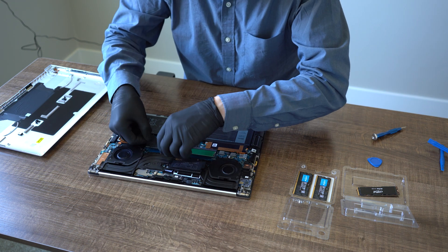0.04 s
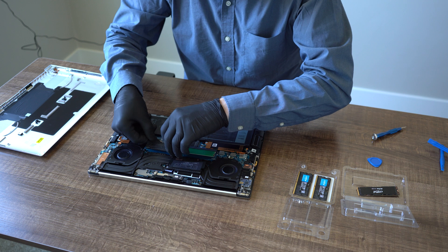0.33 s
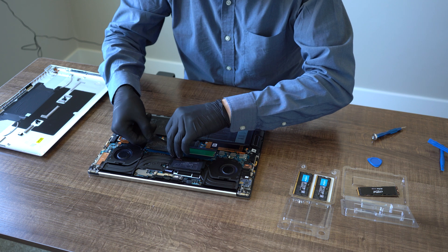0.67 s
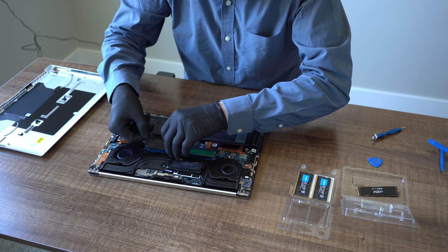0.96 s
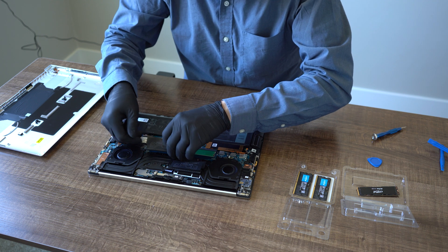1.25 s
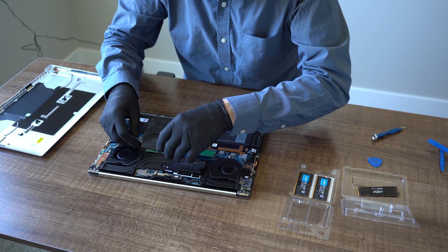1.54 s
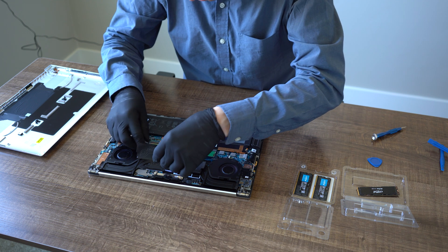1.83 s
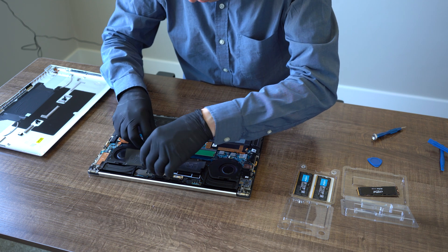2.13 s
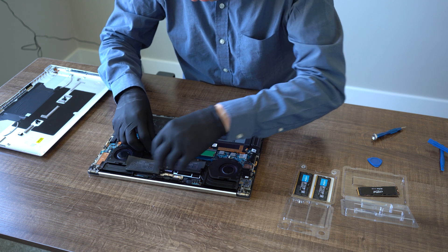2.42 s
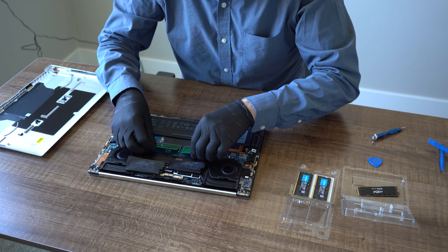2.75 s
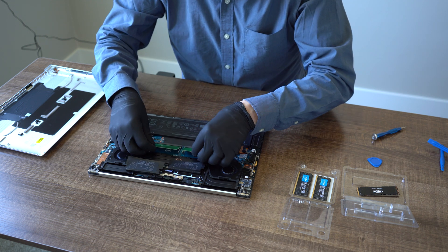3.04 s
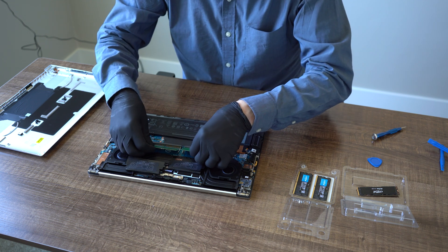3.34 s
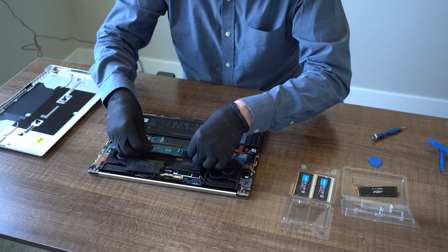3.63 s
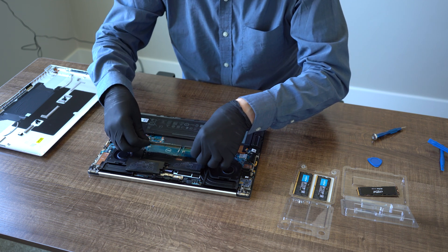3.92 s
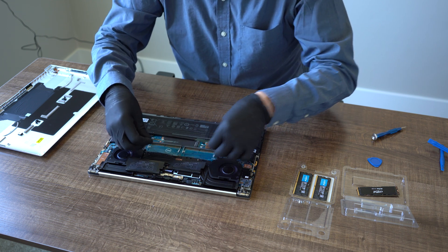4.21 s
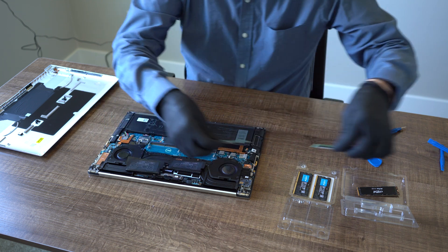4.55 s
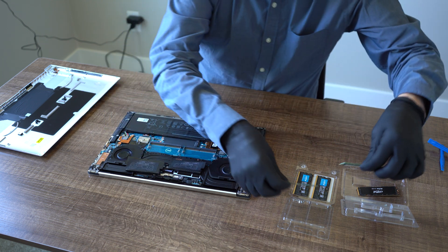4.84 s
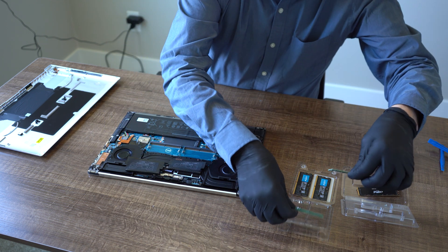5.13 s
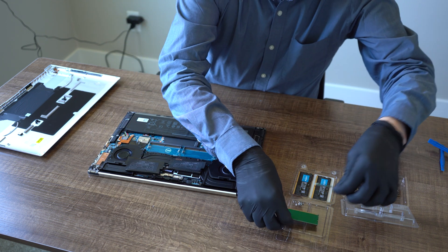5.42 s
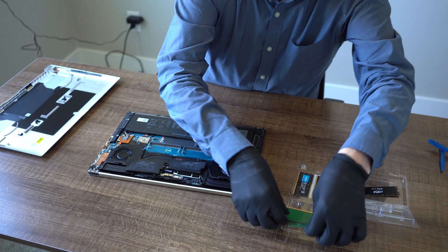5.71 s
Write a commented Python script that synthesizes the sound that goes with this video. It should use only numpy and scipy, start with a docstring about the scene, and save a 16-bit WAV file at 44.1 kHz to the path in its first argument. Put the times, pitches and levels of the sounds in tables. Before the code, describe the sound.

In a small, echoing room with faint hiss and hum, a laptop's memory modules are unlatched straight in front of the microphone. Light metal ticks and dull finger knocks on the circuit board surround several sharp snaps, one loud pair ringing with a steel twang. Gloves rustle quietly throughout. After a short lull, cloth swishes and the modules click and scrape into a thin plastic tray a little to the right.

```python
"""In a small, echoing room with a low hum, gloved hands rustle and tick at the clips of an open laptop.
From about 0.9 s the latches of two memory modules snap: the board rings, the case thumps on the wooden
table, and at 1.6 s a steel spring twangs. Fingers knock on the board as the modules pop up and come out.
Near 4.5 s a sleeve swishes as the arms swing over; then the modules tap and skid in a thin plastic tray."""
import sys
import numpy as np
from scipy import signal
from scipy.fft import rfft, irfft, next_fast_len
from scipy.io import wavfile
from scipy.ndimage import uniform_filter1d

SR = 44100
rng = np.random.default_rng(int(sys.argv[2]) if len(sys.argv) > 2 else 0)


def dump(signal):
    """Clip the signal to [-1, 1] and save it as 16-bit WAV at the path in sys.argv[1]."""
    limited = np.clip(np.atleast_2d(signal).T, -1, 1)
    pcm = np.round(limited * 32767).astype(np.int16)
    wavfile.write(sys.argv[1], SR, pcm)


N = 263277
SIZE = 32768   # samples in one short sound
TIME = np.arange(N) / SR   # seconds since the scene began
AGE = np.arange(SIZE) / SR   # seconds since a short sound began
FREQ = np.maximum(np.fft.rfftfreq(SIZE, 1 / SR), 1)   # its frequencies in Hz
PIVOT_HZ = 2120   # where bass and treble meet


def from_db(db):
    """Turn decibels into a factor to multiply by."""
    return 10 ** (np.asarray(db) / 20)


def rms_one(x):
    """Scale a signal to an average power of 1."""
    return x / np.sqrt(np.mean(x ** 2) + 1e-20)


def at_hz(points, hz):
    """Read between the rows of a (pitch_hz, value) table, with octaves evenly spaced."""
    pitches, values = np.transpose(points)
    return np.interp(np.log(np.maximum(hz, 1)), np.log(pitches), values)


def level_curve(rows):
    """Volume over time from (time_s, level_db) rows."""
    return from_db(np.interp(TIME, *np.transpose(rows)))


def bell(f, hz, width):
    """A resonance: a peak of height 1 around one pitch."""
    return 1 / (1 + (2 * (f - hz) / width) ** 2)


def add(out, start_s, sound):
    """Mix a short sound in, fading out its very end."""
    i = int(np.clip(round(start_s * SR), 0, N - 1))
    fade = np.minimum(1, np.linspace(10, 0, SIZE)) ** 2
    out[:, i:i + SIZE] += (sound * fade)[:, :N - i]


def diffuse(size):
    """Spectrum of white noise from all around: left and right match in the bass but not in the treble."""
    # how alike the two microphones hear it: pitch_hz, likeness (0 to 1)
    likeness = [(60, 1), (130, 0.98), (260, 0.86), (520, 0.57), (1000, 0.35), (2000, 0.03), (4000, 0),
                (9000, 0.05)]
    alike = np.clip(at_hz(likeness, np.fft.rfftfreq(size, 1 / SR)), 0, 1)
    mid, side = rfft(rng.standard_normal((2, size)))
    return (np.sqrt(1 + alike) * mid + np.sqrt(1 - alike) * side * [[1], [-1]]) / np.sqrt(2)


def noise(gain_at):
    """Stereo noise of power 1; gain_at says how strong each frequency is."""
    size = 2 * next_fast_len(N // 2 + 1)
    spectrum = diffuse(size) * gain_at(np.fft.rfftfreq(size, 1 / SR))
    return rms_one(irfft(spectrum)[:, :N])


def room_decay(early_boost=3.9, early_s=0.029, gap_s=0.00087):
    """Split the room's echo into bands of pitch; each falls quickly at first, then slowly."""
    # time the room takes to fade by 60 dB: pitch_hz, fade_s
    fade_times = [(120, 0.69), (300, 0.83), (1000, 0.71), (2000, 0.77), (3900, 0.81), (7500, 0.6),
                  (14000, 0.39)]
    hz, fade_s = np.transpose(fade_times)
    bands = np.array([at_hz(list(zip(hz, one)), FREQ) for one in np.eye(len(hz))])
    slow = from_db(-60 * AGE / fade_s[:, None]) ** 2
    quick = early_boost * np.exp(-AGE / early_s)
    onset = 1 - np.exp(-(AGE / gap_s) ** 2)
    power = (slow + quick) * onset
    return bands, np.sqrt(power / power.sum(axis=1, keepdims=True))


def room(direct_db, decay, scatter_s=0.0012, scatter_hz=3600, small_hz=400, shade_hz=9500):
    """Spectrum of the room's answer to a click: direct sound, first echoes and a fading tail."""
    # first echoes from table and walls: delay_s, left_db, right_db
    echoes = [(.0042, -4, -23), (.0067, -3, -11), (0.0123, -15, -27), (0.0173, -11, -5.5)]
    white = diffuse(SIZE)
    tail = sum(irfft(white * band) * envelope for band, envelope in zip(*decay))
    paths = np.zeros((2, SIZE))
    paths[:, 0] = 1
    for delay, left_db, right_db in echoes:
        paths[:, int(delay * SR * rng.uniform(.95, 1.05))] += from_db([left_db, right_db])
    # the bass leaves as one pulse, the treble scatters off small parts for a millisecond
    scatter = rng.standard_normal(512) * np.exp(-AGE[:512] / scatter_s)
    scatter = rfft(scatter / np.linalg.norm(scatter), SIZE)
    z = 1j * FREQ / scatter_hz
    pulse = (1 + z * z * scatter) / (1 + np.sqrt(2) * z + z * z)
    pulse *= 1j * FREQ / (1j * FREQ + small_hz)   # small parts give off little bass
    pulse /= 1 + 1j * FREQ / shade_hz   # the hands block the highest treble
    return rfft(tail) + from_db(direct_db) * pulse * rfft(paths)


def push(tone, weight_db, hardness_db, low_hz=910, high_hz=7560):
    """Tone of a touch in dB: a heavier one has more bass, a harder one more treble."""
    tilt = [(low_hz, weight_db), (PIVOT_HZ, 0), (high_hz, hardness_db)]
    return at_hz(tone, FREQ) + at_hz(tilt, FREQ)


def struck(tone_db):
    """Turn a tone curve into the spectrum of a sound that starts at once, then rings (minimum phase)."""
    cepstrum = irfft(np.log(from_db(tone_db)))
    cepstrum[1:SIZE // 2] *= 2
    cepstrum[SIZE // 2 + 1:] = 0
    return np.exp(rfft(cepstrum))


def plate(tone_db, modes, spread_s):
    """A push makes a thin plate ring; as it bends, the treble travels ahead of the bass."""
    boost_db = sum(db * bell(FREQ, hz, width) for hz, width, db in modes)
    bass_lag = np.exp(-4j * np.pi * spread_s * np.sqrt(FREQ * PIVOT_HZ))
    return struck(tone_db + boost_db) * bass_lag


def background(air_db=-57.5):
    """The room's faint hiss and wavering low hum."""
    # tone of the hiss: pitch_hz, level_db
    air_tone = [(12, -48), (20, 9.5), (49, -9), (116, 0.5), (198, -5.5), (310, -8.5), (357, -7),
                (399, -11.5), (513, -6), (873, -14), (1090, -12.5), (1370, -15), (1810, -14.5),
                (14700, -27.5), (16000, -35)]
    # notes of the hum: pitch_hz, width_hz, level_db
    hum_notes = [(75.74, 2.4, 0.5), (63.7, 10, -2), (110, 4.7, -5)]
    # rise and fall of the hum: time_s, level_db
    hum_levels = [(0.0, -66), (0.25, -56), (1.48, -63.5), (1.66, -59.5), (2.33, -70), (3.92, -53.5),
                  (4.26, -57), (4.59, -54.5), (5.97, -58)]
    air = noise(lambda f: from_db(at_hz(air_tone, f)))
    hum = noise(lambda f: sum(from_db(db) * bell(f, hz, width) for hz, width, db in hum_notes))
    return from_db(air_db) * air + level_curve(hum_levels) * hum


def gloves_and_sleeves(swing_s=4.534, hold_s=0.35, swing_db=-49.5, grain_db=-1.8):
    """Cloth slides in many tiny slips: quietly as the fingers work, in one swish as the arms swing."""
    # tone of rubbing cloth: pitch_hz, level_db
    cloth_tone = [(90, -17), (170, -17.5), (400, -3.5), (700, -9), (1100, -6), (2400, -7), (4200, -15),
                  (8500, -15.5), (12000, -22.5), (16000, -29)]
    # rustle of the gloves: time_s, level_db
    glove_levels = [(0, -54.5), (.2, -65), (.7, -68.5), (1.55, -58), (2.15, -74), (2.42, -60.5), (3.0, -63),
                    (4.1, -78), (5.2, -60), (5.97, -61)]
    rise_db_per_s, fall_db_per_s = 68, 43
    before = np.maximum(swing_s - TIME, 0)
    after = np.maximum(TIME - swing_s - hold_s, 0)
    swing = from_db(swing_db - rise_db_per_s * before - fall_db_per_s * after)
    slips = rms_one(uniform_filter1d(rng.standard_normal(N), size=200))
    cloth = noise(lambda f: from_db(at_hz(cloth_tone, f)))
    return cloth * np.hypot(level_curve(glove_levels), swing) * from_db(grain_db * slips)


def on_board(tone_db, pitch, boost_db, direct_db, decay, sharpness=4.0):
    """One touch on the laptop, heard in the room; the spot where it lands boosts one pitch."""
    # resonances of board and case: pitch_hz, width_hz, boost_db
    board_modes = [(193, 37, 0.5), (270, 22, 7.5), (733, 27, 10), (963.5, 87, 6), (1137.4, 38, 10),
                   (1390, 7.7, -2.5), (1667, 14, 4.5), (1850, 56, 7), (2170, 77, 4), (2376, 16, 7.5),
                   (2700, 15, 8.5), (2620, 25, -8), (3290, 6, 9), (3520, 34, 6), (3990, 570, 3),
                   (5270, 3400, -1), (8600, 6200, -0.5)]
    tone_db = tone_db + boost_db * bell(FREQ, pitch, pitch / sharpness)
    return irfft(plate(tone_db, board_modes, spread_s=0.00028) * room(direct_db, decay))


def clip_ticks(decay, gain_db=-2, boost_db=7.5, direct_db=-5.0):
    """A fingertip slips off a small metal clip, which ticks and then springs back, weaker and thinner."""
    # each slip: start_s, level_db, weight_db, hardness_db, pitch_hz
    ticks = [(0.0102, -26, 6, 3, 7950), (0.193, -20, -14, -7, 3500), (0.2923, -25, -4, 3, 2300),
             (0.3073, -12, -17, 1, 2680), (0.7985, -5.5, 7.5, 4, 4770), (0.8934, -7.5, 2, -3, 4600),
             (1.214, -23, -6, -7, 8000), (2.3779, -6.5, 6.5, -9.5, 3770), (2.481, -25, 12, -3.5, 7000),
             (3.3783, -10, 17.5, 1, 12800), (3.867, -18.5, 12.5, 1, 3890)]
    # tone of a tick: pitch_hz, level_db
    tick_tone = [(30, -6), (130, -18), (410, -5.5), (1030, -3.5), (2030, 0), (4200, -0.5), (7900, 2),
                 (11500, -2), (15000, -11)]
    rebound_s, rebound_db, harder_db = 0.012, -19, 14
    out = np.zeros((2, N))
    for start, level, weight, hardness, pitch in ticks:
        tone = gain_db + level + push(tick_tone, weight, hardness)
        rebound = gain_db + level + rebound_db + push(tick_tone, weight, hardness + harder_db)
        add(out, start, on_board(tone, pitch, boost_db, direct_db, decay))
        add(out, start + rebound_s, on_board(rebound, pitch, boost_db, direct_db, decay))
    return out


def finger_knocks(decay, gain_db=-2, boost_db=13.0, near_db=-1):
    """Gloved fingers knock dully on the board."""
    # each knock: start_s, level_db, weight_db, hardness_db, direct_db, pitch_hz
    knocks = [(0.86, -8.5, 2, 10, -8, 1800), (.894, -3.5, 0, -3, -4, 450),
              (1.2572, -12.5, 1.5, 9.5, -4.5, 2180), (1.264, -21, 7.5, -3, 0.5, 1150),
              (1.303, -26, -9, 11, 0, 3420), (1.417, -15.5, 2.5, 8.5, -4, 450),
              (1.459, -1, -2, 1, -11.5, 450), (2.1952, -19.5, 6, 5, -4, 1300),
              (2.237, -12.5, 2, -3, -3.5, 1190), (2.2437, -8, -3, -1, -8, 1060),
              (2.27, -6, -3, -1, 0, 3400), (2.348, -13, 3, -10, -0.5, 666),
              (3.269, -17, -2, -12, -13, 1680), (3.331, -13, 3, 6, -7, 2000),
              (3.481, -11, -7, 7, -3.5, 1430), (3.852, -4.5, 0, 8.5, -9.5, 790),
              (3.8883, -4, -8.5, -8, 0.5, 1130), (4.588, -9.5, -5.5, 13, -4.5, 730),
              (4.63, -9.5, 2.5, -3, -6, 462)]
    # tone of a knock: pitch_hz, level_db
    knock_tone = [(30, -20), (130, -1.5), (410, 0), (1030, -0.5), (2030, 0), (3800, -7.5), (5400, -16),
                  (7900, -16.5), (15000, -31)]
    out = np.zeros((2, N))
    for start, level, weight, hardness, direct, pitch in knocks:
        tone = gain_db + level + push(knock_tone, weight, hardness)
        add(out, start, on_board(tone, pitch, boost_db, direct + near_db, decay))
    return out


def latch_snaps(decay, gain_db=-2, boost_db=5, near_db=-2.0):
    """A latch lets go or a module springs up against its stop; the hands cover some of the snaps."""
    # each snap: start_s, level_db, weight_db, hardness_db, direct_db, pitch_hz
    snaps = [(.878, 4.5, -1.5, 1.5, -9.5, 1550), (.893, -1, 4.5, 13.5, -0.5, 4500),
             (1.5556, 17, -3.5, 0.5, -1.5, 1530), (1.594, 10, 2.5, 11.5, -12, 1220),
             (2.596, -8, 5.5, -8, -19, 1700), (2.6044, 5, -4.5, 3, 0, 1800), (2.615, 10, -2, 2.5, -4, 3230),
             (2.626, -5.5, 3.5, 8.5, 8.5, 1640), (3.0405, -6, -7, -8, -2.5, 1560),
             (3.3465, 3, -4.5, -4, -2, 1750), (3.378, 6.5, -7, -9.5, 1, 2080)]
    # tone of a snap: pitch_hz, level_db
    snap_tone = [(30, -61), (130, -14.5), (300, -11), (460, -10), (620, -9.5), (1030, -1), (2030, 0),
                 (3800, -4), (5200, -13.5), (7900, -12.5), (11000, -22.5), (15000, -28)]
    out = np.zeros((2, N))
    for start, level, weight, hardness, direct, pitch in snaps:
        tone = gain_db + level + push(snap_tone, weight, hardness)
        add(out, start, on_board(tone, pitch, boost_db, direct + near_db, decay))
    return out


def case_thumps(pitch_hz=123, fade_s=0.86, swell_s=0.0058):
    """After a hard snap the laptop bounces on its rubber feet and the table top booms softly."""
    # each bounce: start_s, level_db
    thumps = [(.893, -50), (1.557, -41), (2.379, -52), (2.608, -54.5), (3.381, -53)]
    envelope = (1 - np.exp(-AGE / swell_s)) * from_db(-60 * AGE / fade_s)
    boom = np.sin(2 * np.pi * pitch_hz * AGE) * envelope
    out = np.zeros((2, N))
    for start, level in thumps:
        add(out, start, from_db(level) * boom[None])
    return out


def spring_twangs(decay, direct_db=-8):
    """The freed steel spring clip rings on at a few high pitches."""
    # each twang: start_s, level_db
    twangs = [(1.556, 14.5), (1.595, 14)]
    # resonances of the spring: pitch_hz, width_hz, level_db
    spring_modes = [(4530, 160, 1), (5370, 40, -10), (6340, 70, -3), (6970, 38, -2), (7800, 79, -1),
                    (8230, 56, -15), (9900, 330, -11), (13100, 90, -16), (13600, 200, -19)]
    ring = sum(from_db(db) / (1 + 2j * (FREQ - hz) / width) for hz, width, db in spring_modes)
    out = np.zeros((2, N))
    for start, level in twangs:
        add(out, start, irfft(from_db(level) * ring * room(direct_db, decay)))
    return out


def table_brushes(pitch_hz=275, width_hz=70, lead_s=0.23):
    """Arms and hands brush the table top and stir a low resonance that swells and fades."""
    # each brush: peak_s, level_db, width_s
    brushes = [(2.558, -59.5, 0.18), (3.085, -60, 0.033), (3.216, -56.5, 0.054), (4.88, -60.5, 0.21),
               (5.208, -62.5, 0.25), (5.943, -59, 0.19)]
    out = np.zeros((2, N))
    for peak_s, level, width_s in brushes:
        rub = rms_one(irfft(diffuse(SIZE) * bell(FREQ, pitch_hz, width_hz)))
        swell = np.exp(-.5 * ((AGE - lead_s) / width_s) ** 2)
        add(out, peak_s - lead_s, from_db(level) * rub * swell)
    return out


def on_tray(tone_db, direct_db, decay, pan_db=-2.0):
    """Spectrum of one touch on the plastic tray, a little to the right, heard in the room."""
    # resonances of the tray: pitch_hz, width_hz, boost_db
    tray_modes = [(453, 51, 11), (1495, 450, -3.5), (1870, 69, 6), (2150, 110, -2), (2293, 155, 9.5),
                  (2530, 100, 9), (3770, 120, 3.5), (8600, 2200, 1.5)]
    left_right = from_db([[pan_db / 2], [-pan_db / 2]])
    return plate(tone_db, tray_modes, spread_s=.00071) * room(direct_db, decay) * left_right


def tray_taps(decay, gain_db=-3, boost_db=9, sharpness=15.0, near_db=-3.0):
    """A module or finger taps the tray; each tap brings out one narrow resonance."""
    # each tap: start_s, level_db, weight_db, hardness_db, direct_db, pitch_hz
    taps = [(4.775, -10, 2, 3, -13, 2240), (4.812, -14, 4, -4, -13, 2450), (5.2451, 3, -12, -43, 8.5, 2230),
            (5.2503, 0, 2.5, -3, -3, 2100), (5.3224, -3.5, -1, 9, -19, 2420),
            (5.33, 3.5, -5, -2.5, -0.5, 2430), (5.6652, 0, 6, 0, -6, 1076),
            (5.9655, 10, -3, -7.5, -13.5, 2560)]
    # tone of a tap: pitch_hz, level_db
    tap_tone = [(30, -13), (130, -13), (410, -12), (1030, -8), (2030, -0.5), (3440, -3), (7900, -8.5),
                (15000, -20.5)]
    out = np.zeros((2, N))
    for start, level, weight, hardness, direct, pitch in taps:
        tone = gain_db + level + push(tap_tone, weight, hardness)
        tone += boost_db * bell(FREQ, pitch, pitch / sharpness)
        add(out, start, irfft(on_tray(tone, direct + near_db, decay)))
    return out


def tray_skids(decay, gain_db=-3, direct_db=-2, ring_hz=2600, ring_width_hz=260, ring_db=3):
    """A module sticks and slips over the ribbed tray: uneven, fading clicks keep its wall ringing."""
    # each skid: start_s, length_s, level_db, weight_db, hardness_db
    skids = [(5.351, 0.07, -5, -3, 7), (5.577, 0.028, -11, -10, -1.5), (5.671, 0.041, 0, -5.5, 1.5)]
    # tone of a slip: pitch_hz, level_db
    slip_tone = [(30, -19), (130, -9), (410, -7), (1030, -6.5), (2030, -3.5), (3700, -1.5), (5200, -7.5),
                 (7900, -11.5), (15000, -27)]
    gap_s, scatter_db, fade_db = .0075, 3.5, 8.5
    out = np.zeros((2, N))
    for start, length, level, weight, hardness in skids:
        jitter, sizes, signs = rng.standard_normal(size=(3, 32))
        gaps = gap_s * np.exp(.25 * jitter)
        when = np.cumsum(gaps) - gaps[0]
        strength = from_db(scatter_db * sizes - fade_db * when / length) * np.sign(signs)
        sliding = when < length
        slips = np.zeros(SIZE)
        slips[(when[sliding] * SR).astype(int)] = strength[sliding]
        tone = gain_db + level + push(slip_tone, weight, hardness)
        tone += ring_db * bell(FREQ, ring_hz, ring_width_hz)
        add(out, start, irfft(rfft(slips) * on_tray(tone, direct_db, decay)))
    return out


def scene():
    """The laptop is straight ahead, the tray a little to the right."""
    decay = room_decay()
    laptop = latch_snaps(decay) + finger_knocks(decay) + clip_ticks(decay)
    laptop += spring_twangs(decay) + case_thumps()
    tray = tray_taps(decay) + tray_skids(decay)
    return laptop + tray + gloves_and_sleeves() + table_brushes() + background()


def record(dry, cutoff_hz=16300):
    """A steep filter cuts off the very highest treble."""
    return signal.sosfilt(signal.ellip(10, .1, 80, cutoff_hz, fs=SR, output="sos"), dry)


dry = scene()
out = record(dry)
dump(out)
```